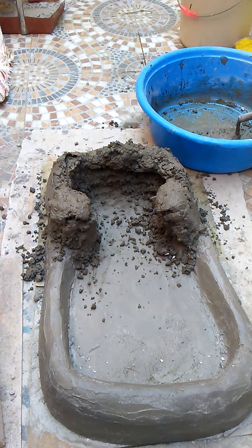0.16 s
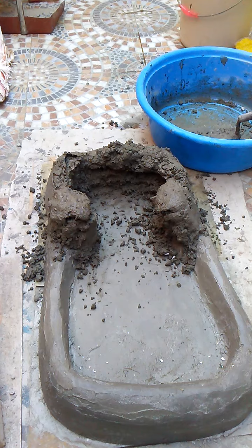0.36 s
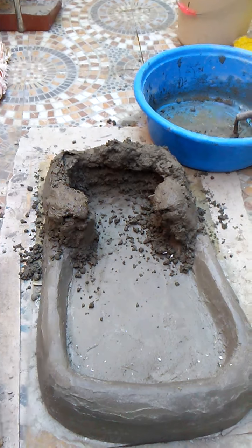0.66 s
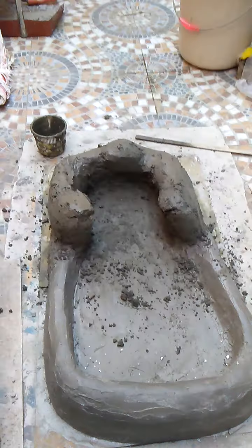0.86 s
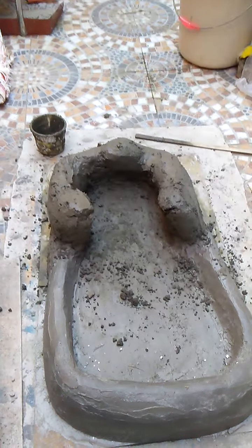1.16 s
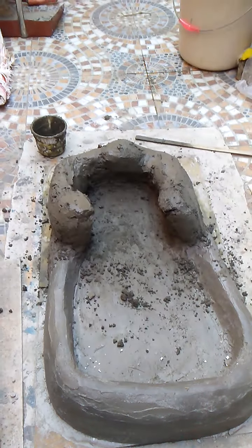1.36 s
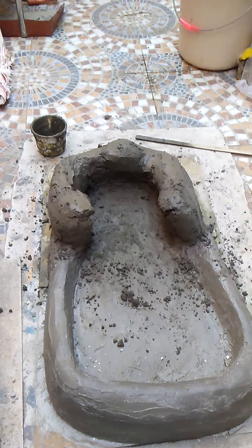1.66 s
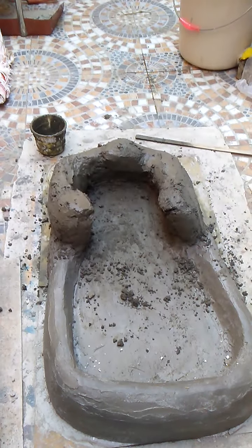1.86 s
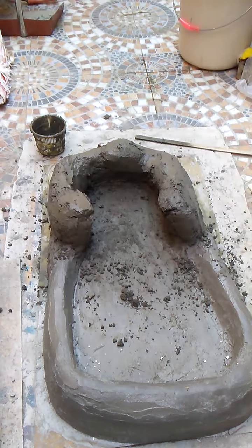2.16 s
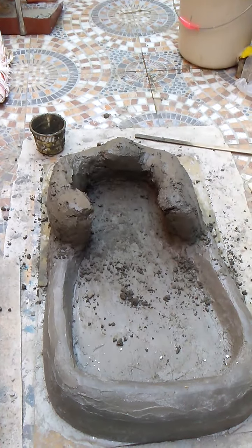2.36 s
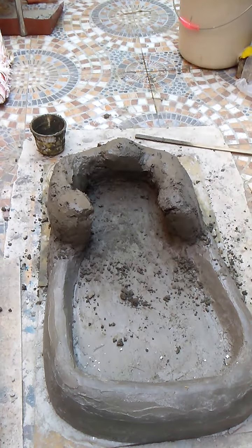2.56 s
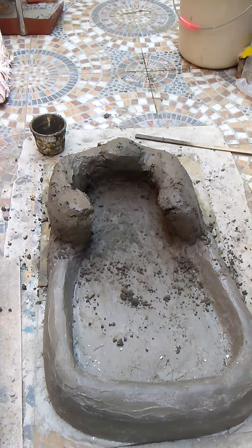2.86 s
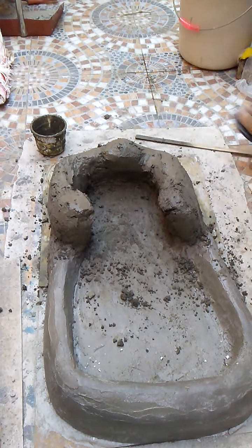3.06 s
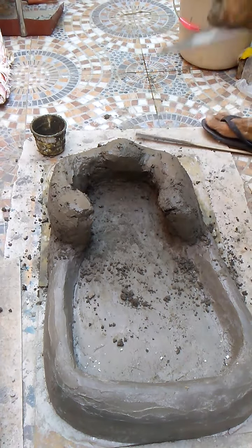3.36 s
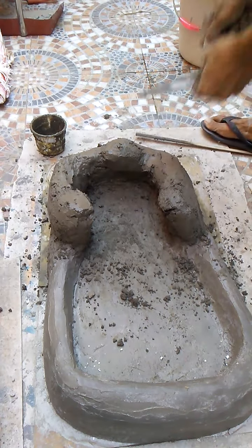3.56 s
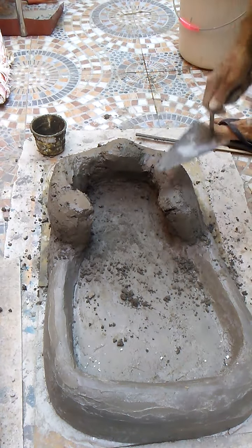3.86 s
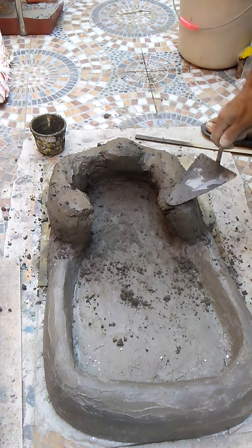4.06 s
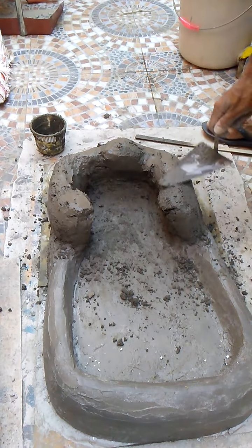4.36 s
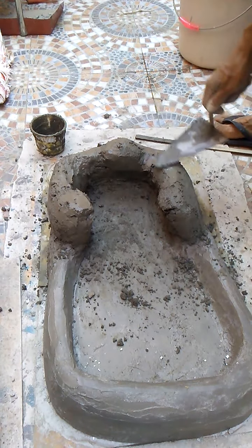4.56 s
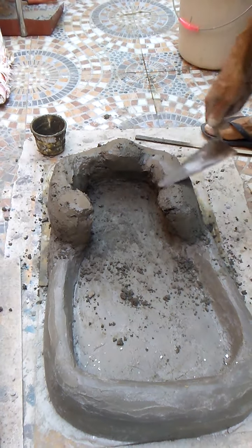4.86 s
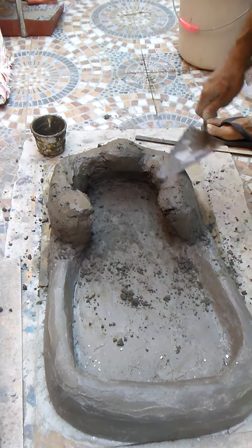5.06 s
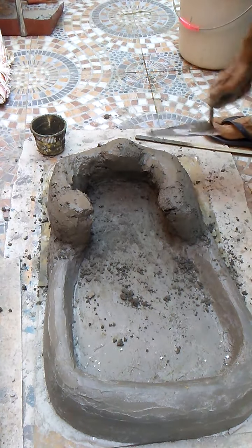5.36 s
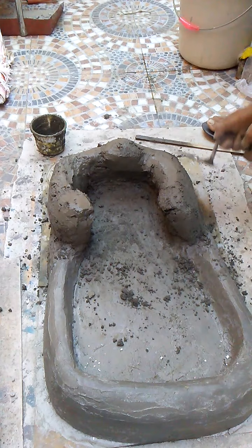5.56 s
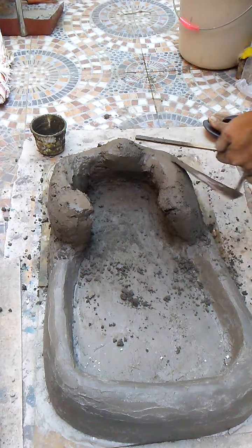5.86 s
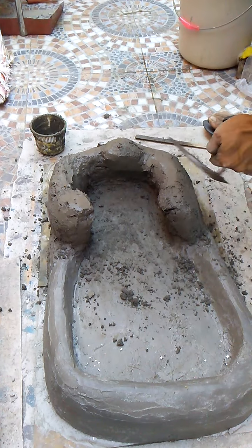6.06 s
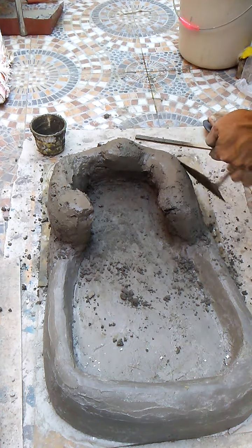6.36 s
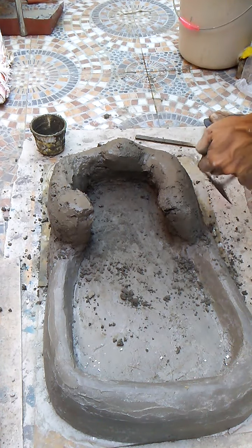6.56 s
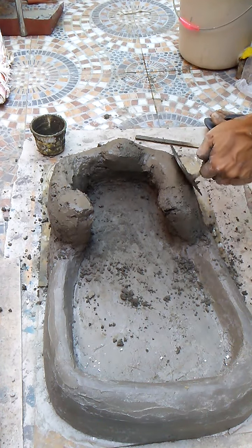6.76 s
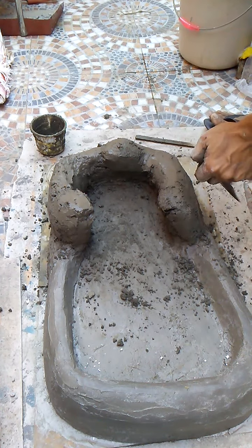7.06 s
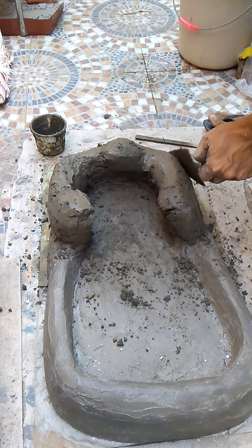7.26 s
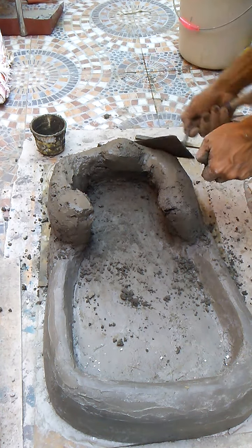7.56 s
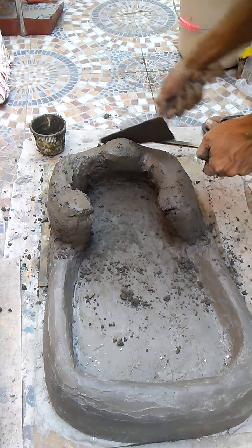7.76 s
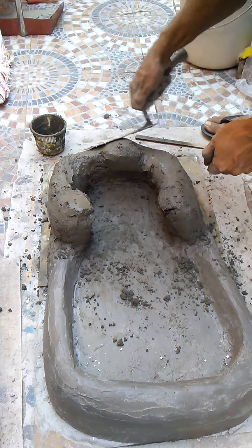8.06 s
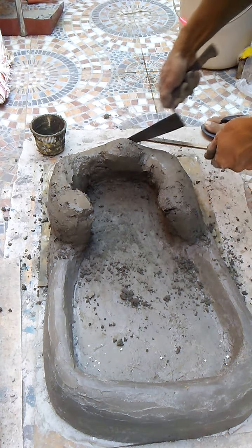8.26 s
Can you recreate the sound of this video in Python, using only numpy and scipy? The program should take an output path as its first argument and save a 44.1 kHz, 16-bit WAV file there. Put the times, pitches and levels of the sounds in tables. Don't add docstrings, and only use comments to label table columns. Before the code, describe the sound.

A close phone-like pickup in a hard tiled room with short echo, faint hiss and soft low thuds through the floor throughout. Almost quiet at first; small dull taps at about 0.8 s. From 1.2 s rubber soles scuff over sandy tiles, with a sharp loud snap at 1.7 s and crunches, cracks and hollow knocks around 2.4 to 2.6 s. A lull follows, with a light knock at 2.9 s, then more shuffling, knocks and grit from 3.1 s, swelling to a dragged scrape near 4.1 s. From 4.2 to 5.4 s a steel trowel makes three raspy strokes on wet mortar, sandy hiss with a damped metallic ring. After a brief pause, five strokes run from 5.7 to 8.4 s: a double press, a slow swell, the hardest and brightest at about 6.95 s, a long uneven one from 7.3 s, and a light last one at 8.1 s, ending with a small click.

```python
import sys
import numpy as np
from scipy import signal
from scipy.fft import rfft, irfft, next_fast_len
from scipy.io import wavfile
from scipy.ndimage import uniform_filter1d

SR = 44100
rng = np.random.default_rng(int(sys.argv[2]) if len(sys.argv) > 2 else 0)


def wrap_up_sound(samples):
    columns = np.atleast_2d(samples).T
    tamed = np.clip(columns, -1, 1)
    steps = np.round(tamed * 32767).astype(np.int16)
    wavfile.write(sys.argv[1], SR, steps)


def decibels_to_gain(level_db):
    exponent = np.asarray(level_db, float) / 20
    return 10 ** exponent


N = 370881
T = np.arange(N) / SR


def trowel():
    # frequency in Hz, level in dB per Hz.
    sand_spectrum = [(180, -51), (300, -1.5), (1290, -9), (1770, -28), (1950, 11), (2680, -11.5),
                     (3860, -4.5), (6890, -5.5), (8410, -4), (13200, -20), (15800, -25)]
    # frequency in Hz, width in Hz, level in dB.
    blade_modes = [(296, 39, -10), (669, 51, -5.5), (1173, 12, -12), (1574, 49, 4.5), (1779, 49, 10.5),
                   (2150, 22, 6), (2264, 130, 7), (2440, 32, 7.5), (3014, 33, -7.5), (3324, 40, -11),
                   (3790, 60, -8), (4046, 140, -8.5), (4010, 100, -14), (4915, 65, -6), (5520, 55, -4),
                   (6000, 42, 0), (6370, 127, -4), (7250, 80, -28), (7570, 175, -2.5), (8200, 51, -18),
                   (8430, 19, -15), (8260, 230, -5), (9100, 125, -5.5), (9920, 45, -4), (10030, 240, -14.5),
                   (11200, 140, -11), (12800, 470, -16.5)]
    sand = [grains(12000, spread_db=2.0, clump_db=1.5) for _ in range(2)]
    parts = list(bands(sand, sand_spectrum, patchy_db=2.0))
    for k, (hz, width_hz, level_db) in enumerate(blade_modes):
        own = np.roll(sand[k % 2], 997 * (k + 1))
        sides = (-1, 1) if hz > 5000 else (0,)
        for side in sides:
            strikes = own[::-1] if side < 0 else own
            ring = wandering(strikes, hz * (1 + 0.0096 * side), width_hz)
            gain = decibels_to_gain(level_db + 6.0 - 7.0 * abs(side)) * flicker(2.5, rate=7.9)
            parts.append((hz, gain * ring))
    return played(parts, (5000, 2750, 2000), pressure()) + singing(sand[0][::-1])


def pressure():
    # time in seconds, pressure as grit level in dB.
    top_strokes = [
        [(4.175, -69.5), (4.189, -49.5), (4.365, -41.5), (4.377, -37), (4.611, -48), (4.745, -79),
         (4.769, -63.5), (4.78, -70.5)],
        [(4.805, -61), (4.823, -45.5), (4.877, -50.5), (4.883, -43.5), (4.923, -34.5), (4.981, -42.5),
         (5.023, -59), (5.05, -54.5)],
        [(5.055, -56), (5.077, -46.5), (5.111, -43.5), (5.181, -43), (5.189, -39.5), (5.311, -46.5),
         (5.403, -63.5), (5.42, -60)],
    ]
    # time in seconds, pressure as grit level in dB.
    side_strokes = [
        [(5.675, -61), (5.683, -41), (5.775, -48), (5.801, -43.5), (5.899, -53), (5.925, -39.5), (6.039, -62.5),
         (6.111, -72.5), (6.15, -82)],
        [(6.225, -85), (6.231, -60), (6.243, -46), (6.293, -57.5), (6.353, -43), (6.525, -36.5), (6.541, -31.5),
         (6.657, -62), (6.72, -72)],
        [(6.81, -77), (6.818, -46.5), (6.872, -37), (6.922, -33.5), (6.956, -25), (6.978, -32), (6.986, -27),
         (7.126, -61), (7.2, -73)],
        [(7.33, -56), (7.346, -40.5), (7.42, -45.5), (7.472, -34), (7.554, -43.5), (7.686, -41.5), (7.724, -38),
         (7.988, -60.5), (8.1, -73)],
        [(8.125, -83), (8.135, -56), (8.169, -46.5), (8.215, -44), (8.301, -51), (8.39, -67)],
    ]
    # ring at 3-5 kHz, at 2-2.7 kHz and under 2 kHz, all in dB.
    holds = [
        (0, -1, 0.9),
        (-1, -1.5, -3.5),
        (1.5, 1, -1.5),
        (-3, -4, -1),
        (1, -2, 0),
        (0.5, -0.5, -2.5),
        (1.5, 3, -0.5),
        (1.5, 6, -1),
    ]
    modes_db = (-8, -19, -15)
    middle_db, damping = -46, (0.098, 0.18, 0.26)
    lift_s, lift_db = 0.11, -6
    out = np.zeros((4, N))
    for rows, hold_db in zip(top_strokes + side_strokes, holds):
        last_s, last_db = rows[-1]
        s, db = np.transpose(list(rows) + [(last_s + lift_s, last_db + lift_db)])
        now = slice(int(s[0] * SR), int(s[-1] * SR))
        grit_db = np.interp(T[now], s, db)
        out[0, now] = decibels_to_gain(grit_db)
        for k, (over, hold, damp) in enumerate(zip(modes_db, hold_db, damping)):
            out[k + 1, now] = decibels_to_gain(grit_db + over + hold - damp * (grit_db - middle_db))
    return uniform_filter1d(out, size=200, axis=1)


def singing(sand):
    # middle in seconds, length in seconds, frequency in Hz, peak rms level in dB.
    free_modes = [(4.217, 0.074, 1790, -53), (5.73, 0.065, 1980, -55.5), (5.83, 0.13, 1800, -51),
                  (5.69, 0.024, 1750, -54), (4.41, 0.34, 2440, -58), (4.52, .25, 2270, -61),
                  (4.4, .08, 4150, -50), (4.93, .08, 3900, -48), (4.92, .06, 2450, -53),
                  (5.22, .2, 2300, -57), (5.2, .2, 3050, -57), (5.8, .12, 3700, -56),
                  (5.69, .03, 4600, -50), (5.95, .1, 2350, -60), (6.255, .04, 4500, -52),
                  (6.54, .06, 3800, -45), (5.15, 0.18, 2400, -56), (4.42, 0.35, 3020, -56),
                  (5.96, 0.11, 3080, -54), (8.17, .06, 3000, -58), (8.33, 0.05, 1780, -64),
                  (3.3, 0.15, 3200, -70), (5.947, 0.078, 1170, -64), (6.61, 0.093, 2420, -57),
                  (6.93, 0.056, 4600, -35), (7.05, 0.07, 1800, -59), (7.49, .08, 3050, -45),
                  (6.85, 0.06, 3000, -55), (5.9, 0.081, 2440, -61), (7.472, 0.12, 2000, -54),
                  (7.724, 0.063, 1590, -43), (8.185, 0.077, 1170, -60)]
    out = np.zeros(N)
    for s, length, hz, peak_db in free_modes:
        now = slice(int((s - 2 * length) * SR), int((s + 2 * length) * SR))
        swell = np.exp(-(2 * (T[now] - s) / length) ** 2)
        out[now] += decibels_to_gain(peak_db) * swell * rms_one(resonance(sand[now], hz, 37))
    return out


def wandering(x, hz, width_hz):
    first_stroke_s, block = 4.1, 2048
    out, state = np.zeros(N), np.zeros(2)
    tune = flicker(0.05, rate=2.86)
    for i in range(int(first_stroke_s * SR), N, block):
        b, a = poles(hz * tune[i], width_hz)
        out[i:i + block], state = signal.lfilter(b, a, x[i:i + block], zi=state)
    return out


def soles():
    # frequency in Hz, level in dB per Hz.
    sole_spectrum = [(180, -64), (300, -9.5), (425, -10.5), (1310, -7), (1550, -4.5), (2350, -4.5),
                     (2910, -1), (6140, 5.5), (8990, 1.5), (15800, -22.5)]
    sand = [grains(9000, spread_db=2.5, clump_db=1.5) for _ in range(2)]
    return played(bands(sand, sole_spectrum, patchy_db=2.0), (4200, 1500), footwork())


def footwork():
    # time in seconds, hiss in dB, fall in seconds per 20 dB,
    # weight on the foot in dB.
    scuffs = [(0.765, -54, -0.2, 8), (0.817, -54, -0.35, 15), (1.066, -59.5, 0.05, 15), (1.13, -75, 1.2, 9),
              (1.276, -34.5, 0.0331, -4.5), (1.551, -42, 0.19, -14), (1.636, -43, .085, 4.5),
              (1.721, -26.5, 0.0275, 5.5), (1.73, -40.5, 0.17, 3), (1.787, -42, 0.13, 8.5),
              (2.014, -52, 0.15, 3), (2.104, -53, 0.43, -4), (2.153, -41, 0.05, 2), (2.378, -39, 0.11, -3),
              (2.475, -37, 0.0863, 3), (2.546, -35.5, 0.13, 5.5), (2.925, -66, 0.15, 18),
              (3.108, -51, .06, -8), (3.2005, -46, .08, -6), (3.281, -45.5, 0.16, 10),
              (3.543, -43, 0.06, 17), (3.892, -38, .4, -2)]
    # peak in seconds, hiss in dB, rise and fall in seconds per 20 dB,
    # weight on the foot in dB.
    slides = [(1.21, -57, -0.34, 0.2, -8), (1.252, -47.5, 0.03, 0.06, -3), (1.31, -47, 0, 0.06, -2),
              (1.594, -39, 0.025, .085, 7.5), (1.929, -61.5, -0.5, 0.25, 16),
              (2.365, -51, 0.06, 0.4, -10.5), (2.464, -42, 0.04, 0.09, 4),
              (2.571, -42, -0.0057, 0.16, 12.5), (2.627, -31, 0.02, 0.02, -4), (2.646, -45.5, 0, 0.07, 1),
              (2.765, -43, 0.06, 0.02, -0.5), (2.79, -55, 0.1, .2, -3), (3.05, -76, 0.3, 1.5, 2),
              (3.14, -61, 0.1, 0.3, -14), (3.335, -37, 0.02, 0.09, -15), (3.436, -38.5, 0.05, 0.14, -3.5),
              (3.574, -38.5, 0.0243, .075, 3.5), (3.67, -44.5, 0.02, 0.25, 0.5),
              (3.715, -44, 0.04, .2, -1.5), (3.825, -47, 0.1, .05, -8), (3.96, -41, 0.065, 0.5, -5),
              (4.035, -38, 0.1, 0.2, -3), (4.07, -30, .14, 0.0647, -3), (4.105, -35, .08, .07, -5)]
    landing_s = 0.0027
    rows = [(s, db, landing_s, fall, weight) for s, db, fall, weight in scuffs] + slides
    s, db, rise, fall, weight = np.transpose(rows)
    crunch_db = -5.5 + 0.4 * weight
    drag_db = -16 + weight
    return np.array([swells(s, db + over, rise, fall) for over in (0, crunch_db, drag_db)])


def snaps():
    # time in seconds, peak in dB, colour in Hz, length in seconds, tile ring in dB.
    grit_snaps = [(0.817, -36, 5470, 0.0019, -14), (1.07, -43, 5600, 0.0036, 16),
                  (3.286, -40, 2300, 0.022, -19.5), (3.326, -34, 5900, .003, -15),
                  (3.677, -35, 6000, .004, -15), (3.685, -36, 6000, .003, -15),
                  (3.714, -33.5, 5000, .003, -5), (3.72, -27, 5000, 0.0033, -5),
                  (1.55, -46, 5600, 0.0021, -8), (1.7176, -11.5, 6000, 0.0013, -4),
                  (1.72, -9.5, 6000, .0022, 1), (1.79, -25.5, 5600, 0.0038, 8),
                  (1.904, -47, 5500, 0.0028, 4), (2.002, -47, 5600, 0.0025, -2),
                  (2.1517, -41, 5640, 0.0051, 5), (2.38, -35, 5630, 0.009, -5),
                  (2.4745, -19.5, 5800, 0.0022, -15), (2.544, -20.5, 5300, 0.0027, -1),
                  (2.567, -35, 5600, 0.0019, 2), (3.028, -50, 5000, .001, -20),
                  (3.1075, -42, 5640, 0.012, -19), (3.2005, -40, 5750, 0.008, -11),
                  (3.213, -39, 5000, .003, -11), (2.764, -32, 4500, .002, -5),
                  (4.821, -40, 6000, .004, -10), (3.896, -33, 5600, 0.0025, 11),
                  (5.682, -37, 5600, 0.0029, -12.5), (5.921, -28, 7060, 0.002, -12),
                  (8.4068, -25, 5900, 0.0057, -21)]
    out, t = np.zeros(N), T[:1800]
    noise = rng.standard_normal((len(grit_snaps), len(t)))
    for (s, peak_db, hz, length, tile_db), burst in zip(grit_snaps, noise):
        crackle = 0.07 * np.exp(-t / 0.014)
        blow = burst * np.minimum(t / 0.00038, 1) * (np.exp(-(t / length) ** 3) + crackle)
        crack = resonance(resonance(blow, hz, 4300), hz, 4800)
        crack = crack + decibels_to_gain(tile_db) * resonance(blow, 3270, 750)
        at = round(s * SR)
        out[at:at + len(t)] += (decibels_to_gain(peak_db) * crack / np.abs(crack).max())[:N - at]
    return out


def knocks():
    # time in seconds, peak in dB, body in Hz, ring in seconds, floor thump in dB.
    floor_knocks = [(1.718, -40, 1140, 0.019, -54), (2.437, -36, 940, 0.02, -46),
                    (2.462, -36.5, 600, .015, -52), (2.5624, -21.5, 1870, 0.027, -62),
                    (2.9185, -46, 1200, 0.02, -62), (3.281, -36, 1100, 0.011, -53.5),
                    (3.296, -36.5, 750, .015, -57), (3.543, -37, 955, 0.02, -50),
                    (3.567, -40.5, 650, 0.01, -51), (3.656, -38, 454, 0.013, -53),
                    (3.891, -34.5, 910, 0.012, -64), (4.006, -35, 1900, 0.012, -79),
                    (4.08, -31, 1500, .008, -79)]
    boom_hz, boom_s = 72, 0.027
    out, t = np.zeros(N), T[:4000]
    noise = rng.standard_normal((len(floor_knocks), 2, len(t)))
    boom = np.sin(2 * np.pi * boom_hz * t) * np.exp(-t / boom_s)
    for (s, peak_db, hz, ring_s, thump_db), (burst, low) in zip(floor_knocks, noise):
        ring = resonance(burst * np.exp(-t / ring_s), hz, 0.35 * hz)
        contact = 0.35 * burst * np.exp(-t / ring_s) * np.exp(-t / 0.003)
        body = resonance(ring + contact, hz, 1.8 * hz)
        thump = resonance(low * t * np.exp(-t / 0.0063), 250, 220)
        at = round(s * SR)
        out[at:at + len(t)] += decibels_to_gain(thump_db) * boom
        out[at:at + len(t)] += decibels_to_gain(peak_db) * body / np.abs(body).max()
        out[at:at + len(t)] += decibels_to_gain(thump_db + 10.5) * thump / np.abs(thump).max()
    return out


def rings():
    # time in seconds, frequency in Hz, peak in dB, 60 dB decay in seconds.
    struck = [(0.7645, 660, -34, .03), (0.7648, 350, -38, .02), (0.7645, 1400, -40, 0.013),
              (0.7645, 2100, -46, .008), (0.770, 1615, -50, .008), (0.770, 2800, -52, .005),
              (0.7675, 67, -30, .11), (0.8163, 361, -38, .06), (0.8163, 1250, -33, .018),
              (0.8185, 2050, -34, .01), (0.823, 1150, -47, .1), (0.821, 62, -36, .1),
              (2.9185, 1120, -37, .04), (2.9185, 1500, -39, .03), (2.93, 1300, -52, .09),
              (2.9185, 1900, -46, .015), (2.379, 2900, -39, .03), (2.476, 4110, -29.5, 0.033),
              (2.5618, 618, -31, 0.033), (2.5618, 1260, -28, .03), (2.565, 3300, -32, .04),
              (3.29, 2264, -41.5, 0.09), (3.544, 1150, -40, .05), (4.005, 1520, -28.5, 0.032),
              (3.892, 1300, -39, .02)]
    out, t = np.zeros(N), T[:9000]
    for s, hz, peak_db, t60 in struck:
        at = round(s * SR)
        out[at:at + len(t)] += decibels_to_gain(peak_db - 60 * t / t60) * np.sin(2 * np.pi * hz * t)
    return out


def room(x):
    t60_s, wall_cut_hz = 0.22, 4300
    size = next_fast_len(N + SR)
    w = 2 * np.pi * np.arange(size // 2 + 1) / size
    dull = 1 / (1 + 1j * w * SR / (2 * np.pi * wall_cut_hz)) ** 0.35
    lags = (rng.uniform(0.011, 0.045, size=16) * SR).astype(int)
    echo = 0
    for k, lag in enumerate(lags):
        loop = decibels_to_gain(-60 * lag / SR / t60_s) * dull * np.exp(-1j * w * lag)
        echo = echo + (-1) ** k * loop / (1 - loop)
    return irfft(rfft(x, size) * echo, size)[:N]


def air():
    # frequency in Hz, level in dB per Hz.
    air_spectrum = [(36, 7.5), (56, -1.5), (135, -15), (300, -18.5), (700, -23), (2000, -31), (6000, -25.5),
                    (11000, -29.5), (15800, -34)]
    # time in seconds, level in dB.
    thuds = [(0.0, -43), (.3, -51), (.79, -50.5), (1.15, -53), (1.73, -47), (2.51, -42), (2.71, -47.5),
             (2.97, -56), (3.3, -47.5), (3.63, -46), (4.03, -50), (3.15, -52), (5.04, -63), (5.53, -50),
             (6.12, -49.5), (7.07, -47), (7.92, -55), (8.13, -51)]
    hiss_db, murmur_db, rumble_db = -66, -64, -56.5
    rise_s, fall_s = 0.13, 0.12
    noise = rng.standard_normal((2, N))
    hiss, murmur, rumble = grouped(bands(noise, air_spectrum, patchy_db=1.8), (5000, 140))
    s, db = np.transpose(thuds)
    thudding = swells(s, db, rise_s + 0 * s, fall_s + 0 * s)
    rumble = rumble * np.hypot(decibels_to_gain(rumble_db), thudding) * flicker(1.94, rate=4.0)
    murmur = murmur * flicker(1.2, rate=4.0)
    return hiss * decibels_to_gain(hiss_db) + murmur * decibels_to_gain(murmur_db) + rumble


def grains(per_s, spread_db, clump_db):
    sizes = decibels_to_gain(spread_db * np.minimum(rng.exponential(1, N), 5)) * rng.choice([-1, 1], N)
    slips = rng.random(N) < per_s / SR
    return rms_one(sizes * slips * flicker(clump_db, rate=19) + 1e-9)


def bands(x, spectrum, patchy_db):
    bottom, top = spectrum[0][0], spectrum[-1][0]
    edges = bottom * 2 ** np.arange(0, np.log2(top / bottom) + 0.34, 1 / 3)
    for k, (low, high) in enumerate(zip(edges, edges[1:])):
        hz = np.sqrt(low * high)
        sos = signal.butter(2, [low, high], "band", fs=SR, output="sos")
        band = signal.sosfilt(sos, x[k % 2])
        yield hz, band * decibels_to_gain(at_hz(spectrum, hz)) * flicker(patchy_db, rate=10.0)


def at_hz(points, hz):
    point_hz, db = np.transpose(points)
    return np.interp(np.log(hz), np.log(point_hz), db)


def grouped(parts, splits_hz):
    groups = np.zeros((len(splits_hz) + 1, N))
    for hz, part in parts:
        groups[np.sum(hz < np.array(splits_hz))] += part
    return [rms_one(group) for group in groups]


def played(parts, splits_hz, gain):
    return (gain * grouped(parts, splits_hz)).sum(axis=0)


def swells(s, db, rise_s, fall_s):
    t = T[::40] - np.array(s)[:, None]
    rise = -np.maximum(rise_s, 1e-3)[:, None]
    fall = np.maximum(fall_s, 1e-3)[:, None]
    level_db = np.array(db)[:, None] - 20 * t / np.where(t < 0, rise, fall)
    power = decibels_to_gain(2 * np.maximum(level_db, -100))
    return np.interp(T, T[::40], np.sqrt(power.sum(axis=0)))


def flicker(spread_db, rate):
    r = np.exp(-80 * np.pi * rate / SR)
    drive = rng.standard_normal(N // 40 + 2002)
    slow = signal.lfilter([1], [1, -2 * r, r * r], drive)[2000:]
    return np.interp(np.arange(N) / 40, np.arange(len(slow)), decibels_to_gain(spread_db * rms_one(slow)))


def poles(hz, width_hz):
    r = np.exp(-np.pi * width_hz / SR)
    return np.array([1, 0, -1]) * (1 - r * r) / 2, [1, -2 * r * np.cos(2 * np.pi * hz / SR), r * r]


def resonance(x, hz, width_hz):
    return signal.lfilter(*poles(hz, width_hz), x)


def rms_one(x):
    return x / np.sqrt(np.mean(x ** 2) + 1e-20)


def scene():
    work = trowel() + soles() + snaps() + knocks() + rings()
    room_db = -18.5
    return (work + decibels_to_gain(room_db) * room(work) + air())[None, :]


def low_pass(x):
    return signal.sosfilt(signal.butter(12, 16440, fs=SR, output="sos"), x)


def record(dry):
    low_cut_hz, top_cut_hz = 45, 15730
    x = signal.sosfilt(signal.butter(8, low_cut_hz, "high", fs=SR, output="sos"), dry)
    x = signal.sosfilt(signal.ellip(12, 0.5, 60, top_cut_hz, fs=SR, output="sos"), x)
    return low_pass(x)


dry = scene()
out = record(dry)
wrap_up_sound(out)
```